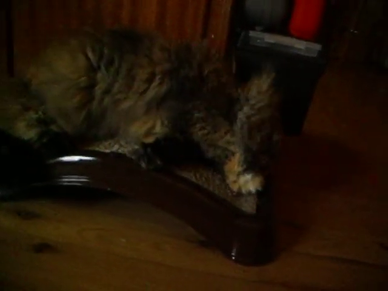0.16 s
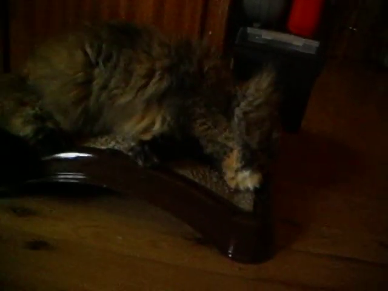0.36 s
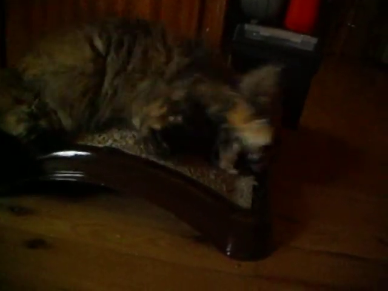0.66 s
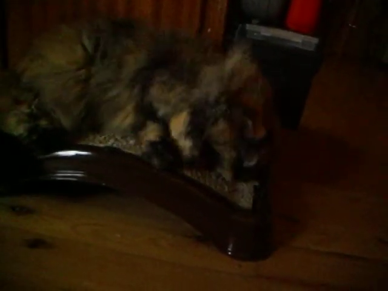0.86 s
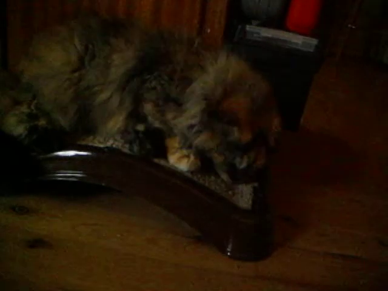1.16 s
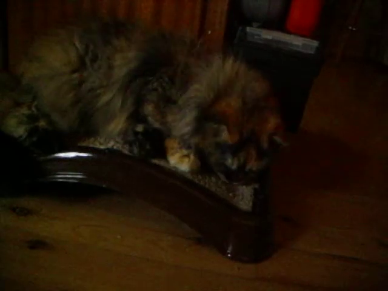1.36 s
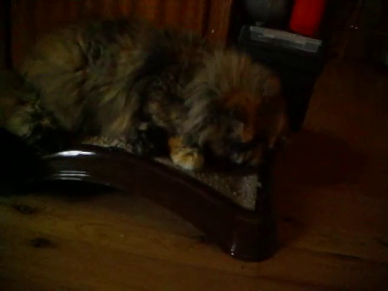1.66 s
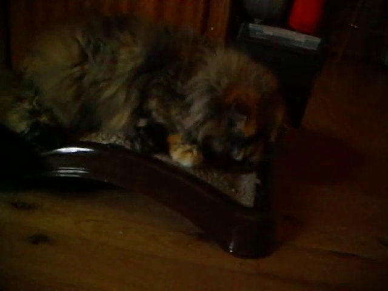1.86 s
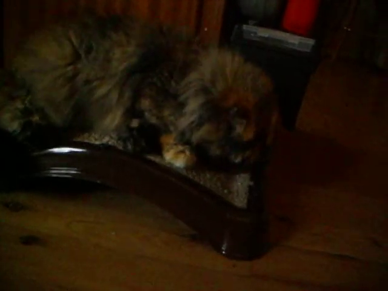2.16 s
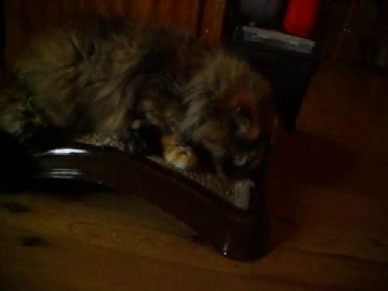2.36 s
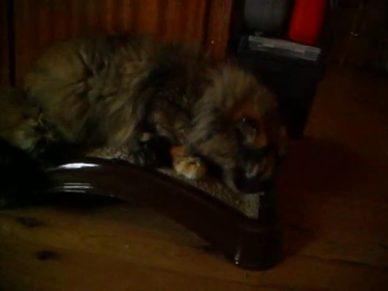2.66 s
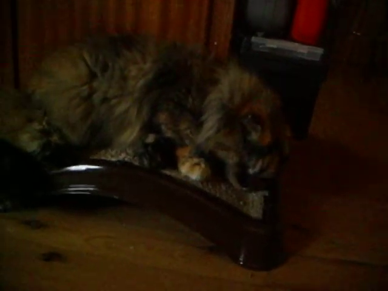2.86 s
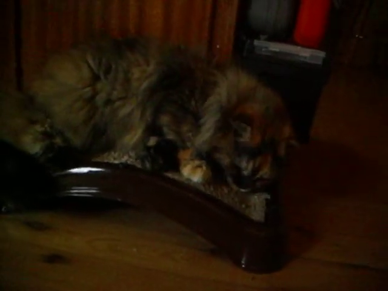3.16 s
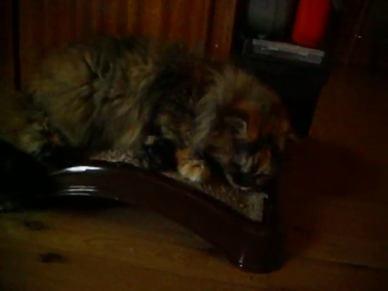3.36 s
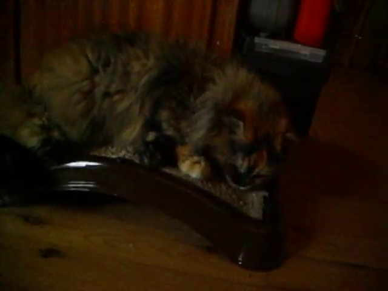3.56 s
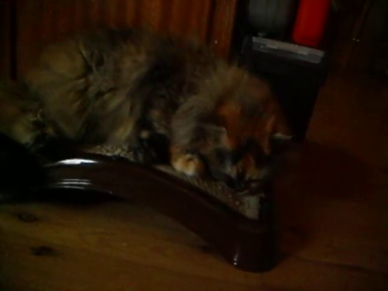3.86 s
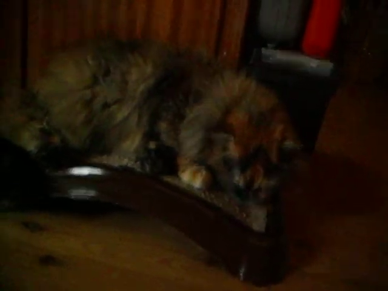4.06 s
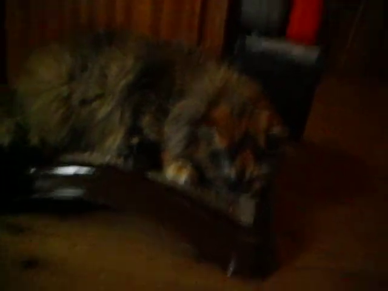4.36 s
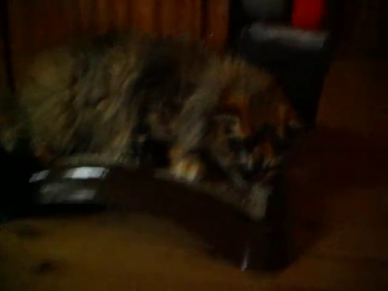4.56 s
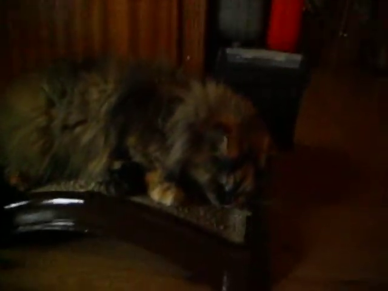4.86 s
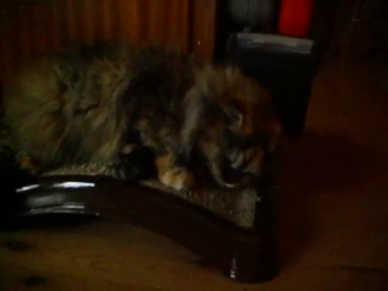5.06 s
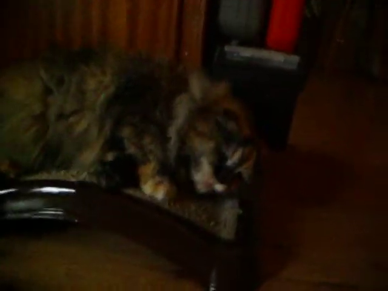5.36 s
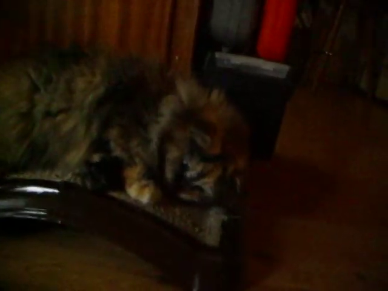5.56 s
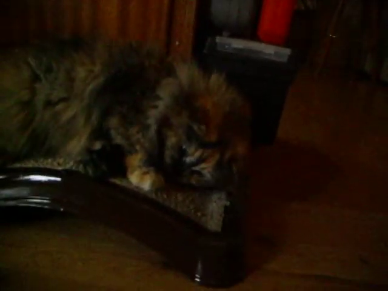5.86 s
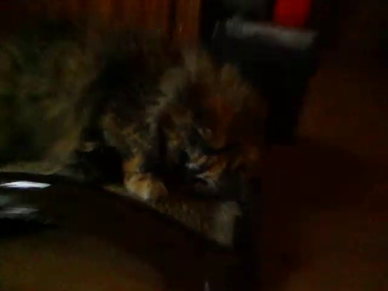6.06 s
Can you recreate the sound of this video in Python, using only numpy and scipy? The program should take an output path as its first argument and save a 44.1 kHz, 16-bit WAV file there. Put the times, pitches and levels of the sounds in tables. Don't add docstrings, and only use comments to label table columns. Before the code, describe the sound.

A low gritty appliance hum indoors as a cat's paw thumps a hollow cardboard scratcher, then claws scrape, skip and snap loose.

```python
import sys
import numpy as np
from scipy import signal
from scipy.fft import rfft, irfft, next_fast_len
from scipy.io import wavfile
from scipy.ndimage import map_coordinates

SR = 44100
rng = np.random.default_rng(int(sys.argv[2]) if len(sys.argv) > 2 else 0)


def invert_db(level):
    return 10 ** (np.asarray(level, dtype=float) / 20)


def unload_audio(sound):
    columns = np.transpose(np.atleast_2d(sound))
    steps = np.round(np.clip(columns, -1, 1) * 32767)
    wavfile.write(sys.argv[1], SR, steps.astype(np.int16))


N = 274743


def unit(x):
    return x / np.sqrt(np.mean(x ** 2) + 1e-20)


def along(points, hz):
    f, value = np.transpose(points)
    return np.interp(np.log(hz + 1), np.log(f + 1), value)


def filtered(x, response):
    size = next_fast_len(N + SR // 2)
    return irfft(rfft(x, size) * response(np.fft.rfftfreq(size, 1 / SR)), size)[:N]


def resonances(modes):
    def response(f):
        total = 0
        for k, (centre, width, db) in enumerate(modes):
            damping = 1j * f * width
            total = total + (-1) ** k * invert_db(db) * damping / (centre * centre - f * f + damping)
        return total
    return response


def wobble(rate):
    knots = rng.standard_normal(int(N * rate / SR) + 4)
    return map_coordinates(knots, [np.arange(N) * rate / SR])


def strike(rings):
    out = np.zeros(N + SR)
    t = np.arange(SR // 10) / SR
    for start, db, hz, t60, rattle, sense in rings:
        noise = signal.lfilter(*signal.iirpeak(hz, 2.2, SR), rng.standard_normal(len(t)))
        rough = unit(noise) * np.minimum(t * hz, 1) ** 2
        pure = sense * np.sin(2 * np.pi * hz * t)
        decay = invert_db(db + 1.5 - 60 * t / t60)
        ring = decay * ((1 - rattle) * pure + 0.84 * rattle * rough)
        band = [min(hz * hz / 4000, hz / 1.6), min(3.5 * hz, 9000)]
        out[round(start * SR):][:len(t)] += signal.lfilter(*signal.butter(2, band, "band", fs=SR), ring)
    return out[:N]


# (f/Hz, level/dB rms, unsteadiness/dB)
MOTOR = [(58.55, -51, .7), (117.05, -56.5, 1.5), (175.6, -64, 2), (193.6, -60.5, 3), (265.6, -59, 1),
         (291.2, -63.5, 3), (351, -70, 3), (3159, -80, 2)]
# (f/Hz, width/Hz, level/dB rms)
DRONE = [(17.93, 10, -56.5), (45.04, 8, -64), (73.86, 8, -66), (102.11, 8, -62), (148.9, 3.6, -68.5),
         (246.1, 5, -73), (449.1, 30, -70)]
# (f/Hz, level/dB per Hz)
AIR = [(5, -6.5), (60, -2), (200, -9.5), (400, -14.5), (800, -18), (1500, -26.5), (3000, -34), (4000, -34)]


def hum():
    t = np.arange(N) / SR
    out = np.zeros(N)
    for hz, db, loose_db in MOTOR:
        level = np.sqrt(2) * invert_db(db + loose_db * wobble(4))
        out += level * np.sin(2 * np.pi * (hz * t + rng.random()))
    for hz, width, db in DRONE:
        out += invert_db(db) * unit(filtered(rng.standard_normal(N), resonances([(hz, width, 0)])))
    air = unit(filtered(rng.standard_normal(N), lambda f: invert_db(along(AIR, f))))
    return out + invert_db(-53 + 0.89 * wobble(2)) * air


# (t/s, peak level/dB, ring f/Hz, lower ring level/dB, t60/s)
TICKS = [(.39, -44, 1850, -60, .02), (.4545, -27, 3270, -46, .014), (.8367, -42, 2000, -37, .018),
         (4.087, -28, 3200, -26, .007), (4.1009, -30, 2400, -16, .008), (4.376, -26, 3700, -28, .005),
         (4.3768, -21, 2750, -30, .006), (5.2087, -33, 1600, -29, .003), (5.474, -42, 3000, -55, .01),
         (5.5056, -30, 3100, -23, .0035), (5.5319, -39, 1800, -55, .008), (5.6768, -7, 3650, -13, .007)]


def claw_ticks():
    rattle, lower_ratio = .3, .56
    rings = []
    for s, db, hz, low_db, t60 in TICKS:
        rings.append((s, db, hz, t60, rattle, -1))
        rings.append((s, low_db, lower_ratio * hz, t60, rattle, -1))
    return strike(rings)


# (release t/s, level/dB, loading/s, flip/s, sense)
FLEXES = [
    (.46, -27, .005, .003, 1),
    (4.1001, -30, .007, .0005, -1),
    (4.1828, -28.5, .012, .0004, -1),
    (4.3033, -28.5, .011, .0007, 1),
    (5.24, -35, .022, .012, -1),
    (5.264, -35.5, .014, .0095, 1),
    (5.338, -30, .011, .003, -1),
    (5.67548, -2.5, .0006, .0001, -1),
]


def flexes():
    t = np.arange(N) / SR
    recovery = .85
    out = np.zeros(N)
    for s, db, load, flip, sense in FLEXES:
        building = np.exp(-((t - s) / load) ** 2)
        relaxing = np.exp(-np.abs(t - s) / (recovery * load))
        out += sense * invert_db(db) * np.tanh((s - t) / flip) * np.where(t < s, building, relaxing)
    return out


# (t/s, peak level/dB, ring f/Hz, t60/s, sense +1 outward -1 inward)
TAPS = [(.4546, -28, 1000, .015, 1), (.4572, -18, 778, .012, 1), (.458, -23, 165, .09, 1),
        (.4605, -21, 240, .05, 1), (.473, -23, 887, .018, 1), (.475, -19, 409, .025, 1),
        (4.0875, -29, 850, .015, 1), (4.088, -27, 450, .025, 1), (4.1088, -25, 500, .05, -1),
        (4.253, -31, 540, .025, 1), (4.305, -19, 510, .027, -1), (4.509, -27, 620, .05, 1),
        (4.62, -42, 1000, .02, 1), (4.806, -34, 800, .02, 1), (5.3425, -27, 487, .014, 1),
        (5.5052, -36, 950, .006, 1), (5.547, -26, 950, .005, 1), (5.6793, -19, 1000, .012, 1)]


def pad_taps():
    return strike([(s, db, hz, t60, .22, sense) for s, db, hz, t60, sense in TAPS])


# (f/Hz, width/Hz, level/dB)
BOOM = [(153.5, 45, 1), (230, 73, -1), (305, 31, 1), (429, 48, -1), (767, 150, -6), (1135, 160, -8)]


def thump():
    t = np.maximum(np.arange(N) / SR - .457, 0)
    rocking = (t > 0) * (t < .125)
    level = invert_db(-60 * t / .28 + 2.2 * wobble(70))
    shake = rng.standard_normal(N) * level * rocking
    return invert_db(-7.5) * filtered(shake, resonances(BOOM))


# (t/s, peak level/dB, pulse f/Hz, board ring level/dB, edge crack level/dB)
PUSHES = [
    (.4614, -4.5, 720, -17.5, -48),
    (3.93795, -4, 2300, -44, -24),
    (3.938, -2, 3400, -50, -22),
    (4.1002, -11.5, 420, -22, -34),
    (4.1833, -7, 623, -31, -37),
    (4.3947, -5, 1550, -15, -17),
    (5.6755, -1.5, 950, -19, -8),
]
PULLS = [
    (.4593, -11, 800, -32, -48),
    (3.7228, -5, 1450, -20, -19),
    (4.3032, -10, 560, -33, -35),
]
# (f/Hz, level/dB, t60/s, rattle 0-1)
BOARD = [(600, -11, .04, .2), (790, 0, .027, .15), (1300, -2, .01, .3)]
# (f/Hz, level/dB, t60/s, rattle 0-1)
EDGE = [(2100, -3, .008, .4), (2700, -3, .01, .5), (3400, -1, .006, .15)]


def claw_snaps():
    rings = []
    for sense, snaps in ((1, PUSHES), (-1, PULLS)):
        for s, db, hz, board_db, edge_db in snaps:
            rings.append((s, db, hz, 2.9 / hz, .03, sense))
            ring_s = s + 1.02 / hz
            crack_s = s + .00016
            rings += [(ring_s, board_db + d, f, t60, rattle, -sense) for f, d, t60, rattle in BOARD]
            rings += [(crack_s, edge_db + d, f, t60, rattle, sense) for f, d, t60, rattle in EDGE]
    return strike(rings)


# (peak t/s, hollow level/dB, scratch level/dB, 10 dB rise/s, 10 dB fall/s)
STROKES = [(.468, -40, -57, .004, .045), (.815, -58, -68, .012, .03), (4.03, -56, -50, .03, .04),
           (4.13, -49, -60, .02, .08), (4.2, -51, -66, .02, .02), (4.257, -54, -62, .03, .04),
           (4.36, -54, -56, .04, .05), (4.415, -49, -56, .012, .03), (4.44, -52, -50, .03, .07),
           (4.51, -39, -55, .06, .016), (4.555, -46, -62, .015, .04), (4.65, -56, -65, .08, .12),
           (4.745, -57, -63, .03, .015), (5.235, -55, -50, .018, .015), (5.465, -61, -56, .01, .013)]
# (f/Hz, width/Hz, level/dB)
HOLLOW = [(480, 90, -6), (640, 90, 0), (800, 150, -8), (1200, 400, -14)]
# (f/Hz, width/Hz, level/dB)
FIBRE = [(1800, 960, 3), (3300, 820, -1)]


def drags():
    t = np.arange(N) / SR
    hollow_level, scratch_level = np.zeros(N), np.zeros(N)
    for s, hollow_db, scratch_db, rise, fall in STROKES:
        stroke = invert_db(-10 * np.maximum((s - t) / rise, (t - s) / fall))
        hollow_level += invert_db(hollow_db) * stroke
        scratch_level += invert_db(scratch_db) * stroke
    out = np.zeros(N)
    for level, modes, clump_db in ((hollow_level, HOLLOW, 1.7), (scratch_level, FIBRE, 1.5)):
        slips = invert_db(clump_db * wobble(150)) * rng.standard_normal(N)
        out += level * unit(filtered(slips, resonances(modes)))
    return out


# (t/s, peak level/dB, ring f/Hz)
SKIPS = [
    (3.9, -42, 2020),
    (3.9076, -37, 1675),
    (3.9382, -13, 1750),
    (3.9409, -16, 2000),
    (3.9424, -12.5, 1880),
    (3.9475, -25, 1300),
    (3.951, -20, 1900),
    (3.9578, -25, 1720),
]


def claw_skips():
    t60, top_t60, rattle = .013, .006, .2
    rings = []
    for s, db, hz in SKIPS:
        rings.append((s, db, hz, t60, rattle, -1))
        rings.append((s, db - 15, 1.6 * hz, top_t60, rattle, 1))
    return strike(rings)


# (t/s, peak level/dB)
TINGS = [
    (4.727, -45),
    (4.7397, -40),
    (4.7971, -45),
    (4.9019, -35),
]


def tings():
    return strike([(s, db, 2620, .03, .07, 1) for s, db in TINGS])


def scene():
    board = claw_ticks() + flexes() + pad_taps() + thump() + claw_snaps()
    return (hum() + board + drags() + claw_skips() + tings())[None]


def band_limit(x):
    return signal.sosfilt(signal.butter(12, 16600, fs=SR, output="sos"), x)


# (f/Hz, level/dB)
SMOOTHING = [(3300, 0), (3750, -1.7), (4000, -6.3), (4180, -13), (4400, -26), (4570, -44), (4750, -75),
             (5200, -120)]


def record(dry):
    up, down = 441, 80
    step, offset_steps, stop_s = np.sqrt(.5) / 128, 1.01, 5.9043
    blocks = N // up + 8
    fast, slow = blocks * up, blocks * down
    guarded = signal.lfilter(*signal.butter(4, 4600, fs=SR), dry[0])
    taper = np.clip(np.linspace(16, 0, slow // 2 + 1), 0, 1)
    sampled = irfft(rfft(guarded, fast)[:slow // 2 + 1] * taper, slow) * down / up
    codes = np.clip(np.round(sampled / step + offset_steps), -128, 127)
    codes[round(stop_s * SR * down / up):] = 0
    hz = np.fft.rfftfreq(fast, 1 / SR)
    images = np.fft.fft(codes * step)[np.arange(len(hz)) % slow]
    played = irfft(images * invert_db(along(SMOOTHING, hz)), fast)[:N] * up / down
    played = np.clip(played, -128 * step, 128 * step)
    return band_limit(played[None])


dry = scene()
out = record(dry)
unload_audio(out)
```